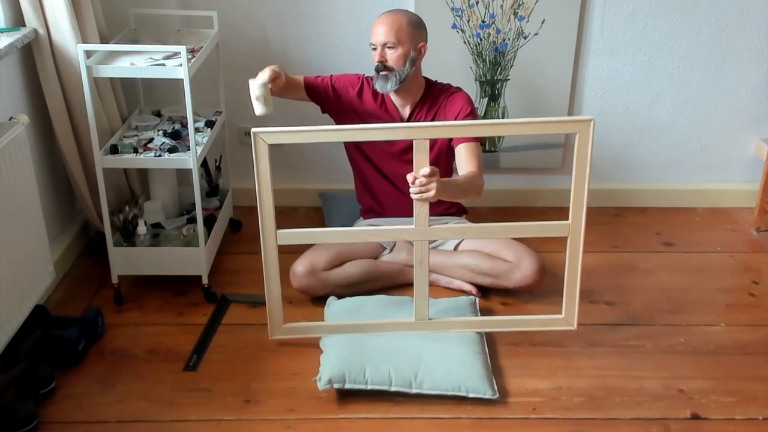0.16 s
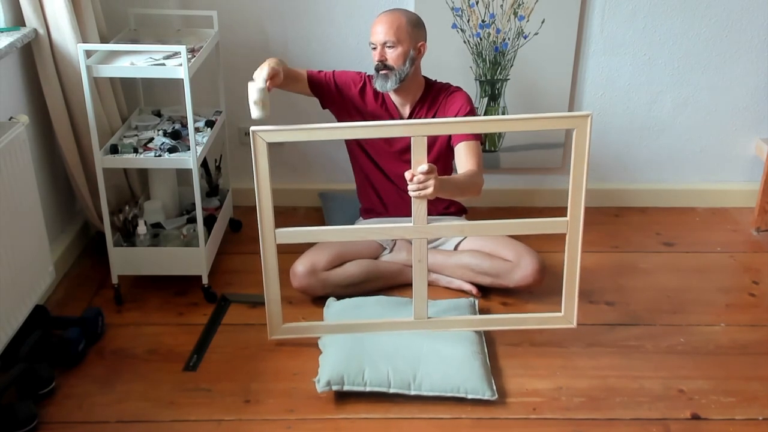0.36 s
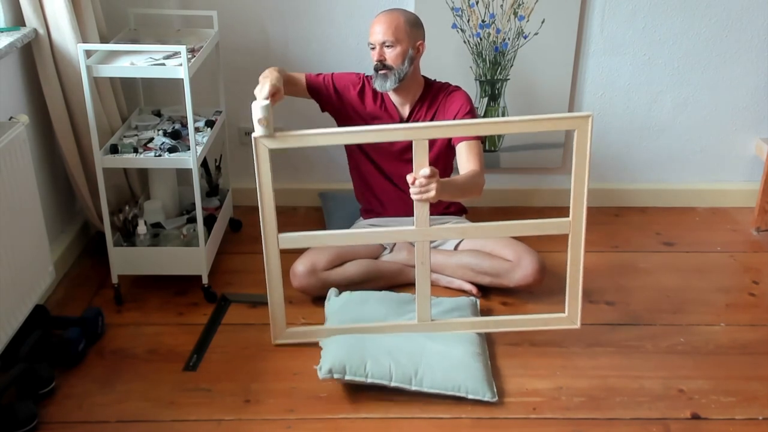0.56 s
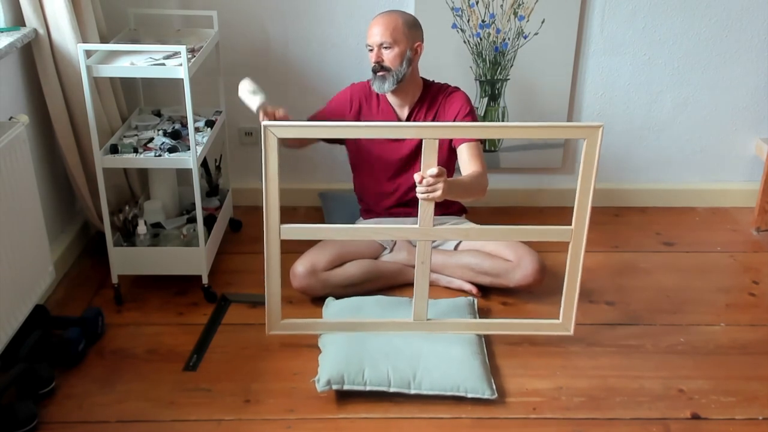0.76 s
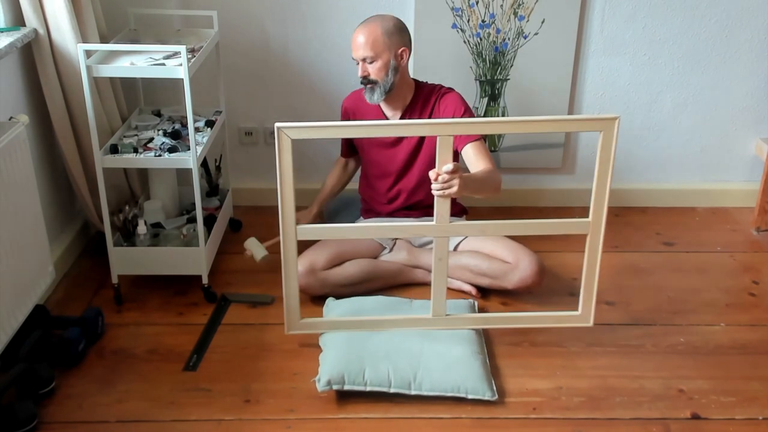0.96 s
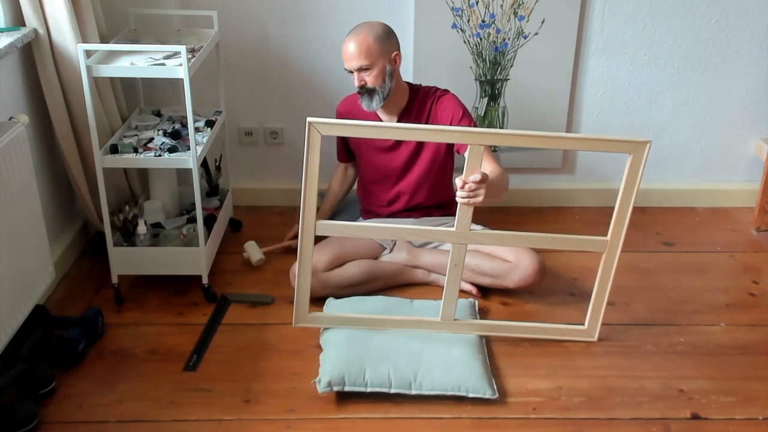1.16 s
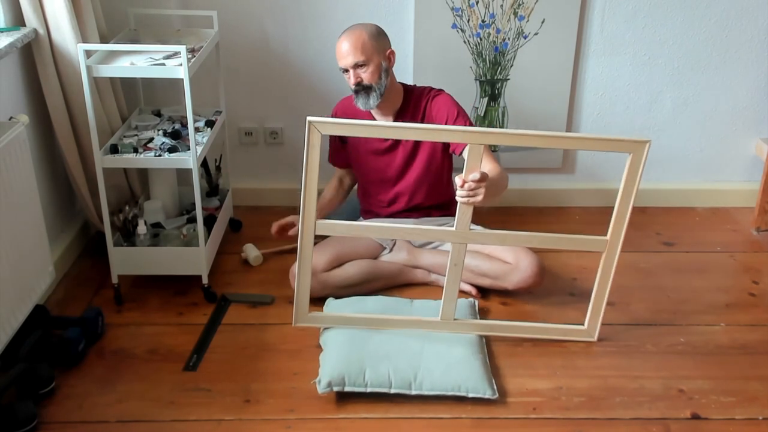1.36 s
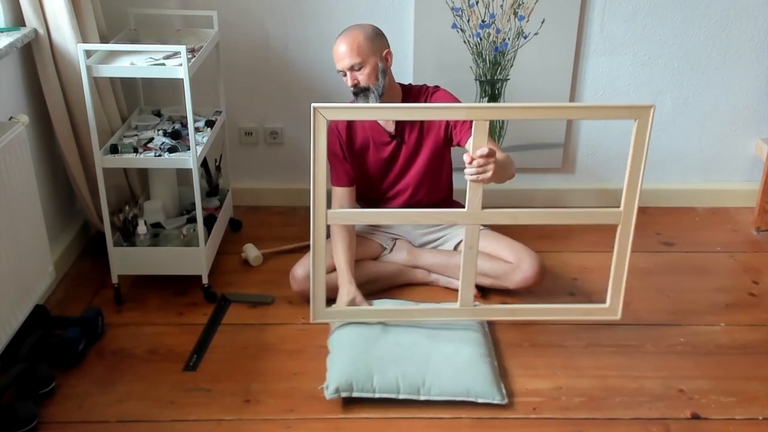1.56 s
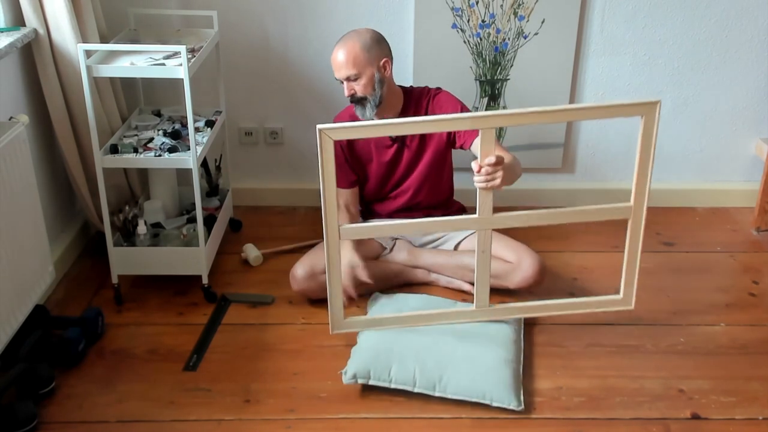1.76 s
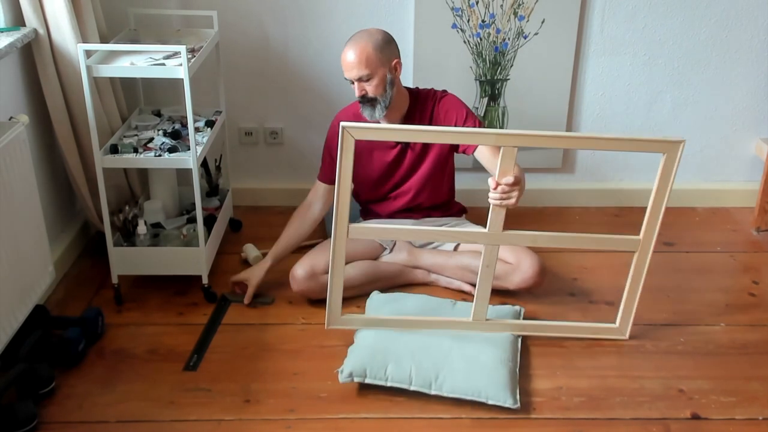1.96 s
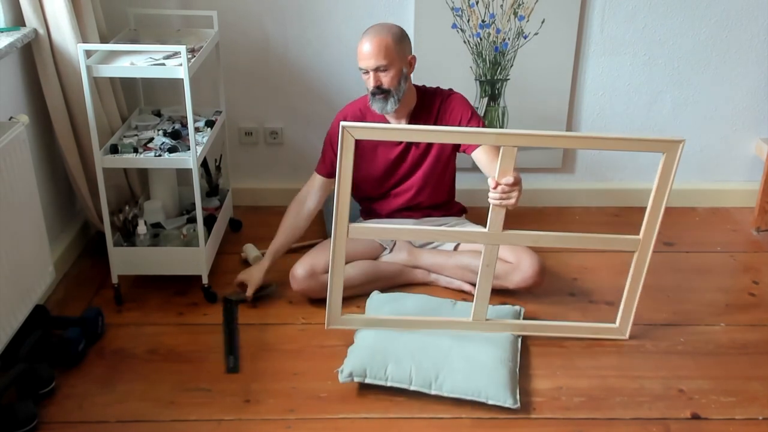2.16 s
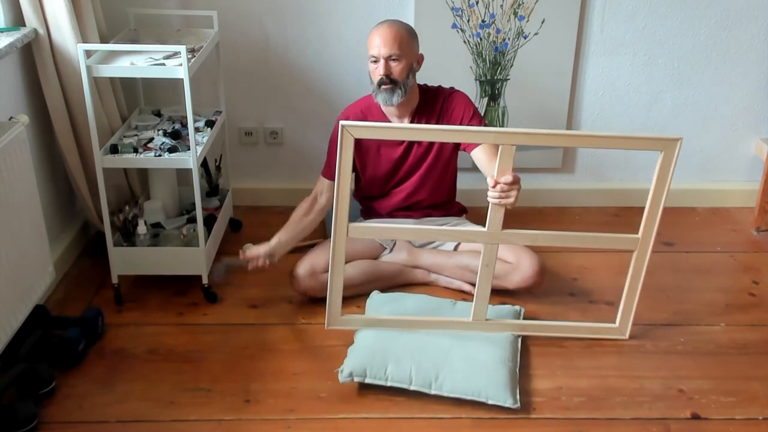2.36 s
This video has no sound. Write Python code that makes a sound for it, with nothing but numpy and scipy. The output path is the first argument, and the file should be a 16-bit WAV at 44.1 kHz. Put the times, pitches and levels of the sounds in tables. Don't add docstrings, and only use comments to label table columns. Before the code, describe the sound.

A soft mallet taps a light wooden frame at 0.1, 0.3 and 0.55 seconds, the first loudest, each hollow and short. Cloth rustles near 0.95; the mallet bumps onto floorboards around 1.15. The frame edge lands at 1.25 with a brief loose-wedge rattle, and its corner knocks at 1.9. From about 2.05 to 2.3 a steel square scrapes and rings over boards. Small, dry furnished room, quiet air noise, close microphone.

```python
import sys
import numpy as np
from scipy import signal
from scipy.io import wavfile

SR = 44100
rng = np.random.default_rng(int(sys.argv[2]) if len(sys.argv) > 2 else 0)


def magnitude_from_level(level_db):
    exponent = np.asarray(level_db, float) / 20
    return 10 ** exponent


def dump_mix(stems):
    frames = np.atleast_2d(stems).T
    limited = np.clip(frames, -1, 1)
    pcm = np.round(limited * 32767).astype(np.int16)
    wavfile.write(sys.argv[1], SR, pcm)


N = 110250

# [f/Hz, t60/s]
ROOM_T60 = [(100, 0.23), (400, 0.21), (1500, 0.17), (5000, 0.19), (14000, 0.12)]
ROOM_DB, ROOM_DELAY_S = -8, 0.0068
CRACK_S = 0.0013
EDGES_HZ = 25 * 2 ** np.arange(0, 9.6, .5)
BANK = [signal.butter(2, pair, "band", fs=SR, output="sos") for pair in zip(EDGES_HZ, EDGES_HZ[1:])]


def rms_one(x):
    return x / np.sqrt(np.mean(x ** 2) + 1e-20)


def in_time(rows, outside=None):
    s, db = np.transpose(rows)
    return magnitude_from_level(np.interp(np.arange(N) / SR, s, db, outside, outside))


def at_hz(points, hz):
    f, value = np.array(points)[:, 0], np.array(points)[:, 1]
    return np.interp(np.log(hz), np.log(f), value)


def samples(events):
    return (np.array(events)[:, 0] * SR).astype(int)


def drift(rate_hz):
    r = np.exp(-80 * np.pi * rate_hz / SR)
    slow = signal.lfilter([1], [1, -2 * r, r * r], rng.standard_normal(N // 40 + 2002))[2000:]
    return np.interp(np.arange(N) / 40, np.arange(len(slow)), rms_one(slow))


def ring(clicks, hz, t60_s):
    r, w = magnitude_from_level(-60 / (t60_s * SR)), 2 * np.pi * hz / SR
    return signal.lfilter([0, np.sin(w)], [1, -2 * r * np.cos(w), r * r], clicks + 1e-18)


def bands(size, first=0):
    white = rng.standard_normal((2, size))
    return [(np.sqrt(EDGES_HZ[k] * EDGES_HZ[k + 1]), signal.sosfilt(BANK[k], white[k % 2]))
            for k in range(first, len(BANK))]


def hiss(spectrum, patchy_db, first=0):
    together = drift(49)
    return rms_one(sum(magnitude_from_level(at_hz(spectrum, hz) + patchy_db * (together + drift(49))) * b
                       for hz, b in bands(N, first)))


def knocks(events, modes, levels_db, tail_db):
    size, mode_sum_db, contact_hz = 9000, -5.5, 2780
    body_room_db, notch_hz = -8.5, 415
    crack_rise_s, knee_hz, bite_db, bite_hz, tail_tilt_db = .00015, 500, 5.5, 3050, -2
    out, t, at = np.zeros(N + size), np.arange(size) / SR, samples(events)
    for k, ((hz, t60), db) in enumerate(zip(modes, levels_db)):
        clicks = np.zeros(len(out))
        clicks[at] = magnitude_from_level(np.array(events)[:, 1] + db + mode_sum_db) * (-1) ** k
        out += ring(clicks, hz, min(t60, .03 + 30 / hz))
    out = signal.lfilter(*signal.butter(2, contact_hz, fs=SR), out)
    notched = signal.lfilter(*signal.iirnotch(notch_hz, 2, fs=SR), out[:N])
    out[:N] += magnitude_from_level(body_room_db) * room(notched)

    crack = 2.06 * (1 - np.exp(-t / crack_rise_s)) * np.exp(-t / CRACK_S)
    onset = np.minimum(t / ROOM_DELAY_S, 1)
    for i, (_, db, crack_db, tilt_db) in zip(at, events):
        parts = []
        for hz, b in bands(size + 900, first=5):
            tilt = tilt_db * np.log2(max(hz, knee_hz) / 4000)
            bite = bite_db * np.exp(-np.log2(hz / bite_hz) ** 2)
            parts.append((hz, magnitude_from_level(tilt + bite) * b[900:]))
        rms = np.std(sum(b for _, b in parts))
        burst = 0
        for hz, b in parts:
            tail = magnitude_from_level(tail_db + tail_tilt_db * np.log2(hz / bite_hz) - 60 * t / at_hz(ROOM_T60, hz))
            burst = burst + b * (crack + tail * onset)
        out[i:i + size] += magnitude_from_level(db + crack_db) / rms / 2 * burst
    return out[:N]


def struck(events, modes, tail_db):
    # [f/Hz, t60/s]
    wood_t60 = [(125, 0.1), (300, 0.066), (1000, 0.023), (2000, 0.017)]
    hz, db = np.transpose(modes)
    lean = np.log2(hz / 500)[:, None] * np.array(events)[:, 4]
    scatter = 1.5 * rng.standard_normal((len(events), len(hz))).T
    return knocks(np.array(events)[:, :4], zip(hz, at_hz(wood_t60, hz)), db[:, None] + lean + scatter, tail_db)


def taps():
    # [t/s, peak/dB, crack re peak/dB, crack tilt/(dB/octave)]
    tap_rows = [
        (0.0805, -3, -7, -3),
        (0.3163, -10, -1.5, -2),
        (0.5637, -11, 1, -2),
    ]
    # [f/Hz, t60/s, level/dB at spots 1, 2, 3]
    frame_modes = [(133, 0.42, -17.5, -7, -35), (143, 0.3, -31, -17.5, -16.5), (255, 0.21, -23, -19.5, -17),
                   (350, 0.19, -26.5, -22.5, -12), (382.3, 0.032, 2.5, 6.5, -7.5),
                   (431.5, 0.061, 1.5, -11, 8.5), (528, 0.13, -23, -24.5, -10.5), (632, 0.048, -10, -6, -9),
                   (847, 0.031, -9.5, -6.5, 0), (1006, 0.025, -6.5, -4.5, 3),
                   (1106, 0.092, -13.5, -9.5, -1.5), (1284, 0.025, -12.5, -5.5, -3.5),
                   (187, 0.035, -20, -26, -35.5), (1237, 0.067, -16.5, -12, -10.5),
                   (1412, 0.042, -19.5, -12.5, -9.5), (1705, 0.06, -18.5, -11.5, -16.5),
                   (1916, 0.054, -14, -11.5, -5.5), (2390, 0.052, -26, -14.5, -16),
                   (2813, 0.012, -18, -8.5, 2), (3315, 0.024, -8, -6.5, -6)]
    slap_db = [-24, -3.5, -28]
    slap_hz, slap_width_hz, slap_tail_db = 12740, 680, -20.5
    wall_s, wall_db, wall_hz = .0125, -17, 7000
    hum_t60_s, hum_db = .45, -46
    m, t, at = np.array(frame_modes), np.arange(6000) / SR, samples(tap_rows)
    clicks, slap = np.zeros(N), np.zeros(N)
    clicks[at] = magnitude_from_level(hum_db)
    decay = np.exp(-t / CRACK_S) + magnitude_from_level(slap_tail_db - 60 * t / at_hz(ROOM_T60, slap_hz))
    for i, db in zip(at, slap_db):
        slap[i:i + len(t)] = magnitude_from_level(db) * decay * rng.standard_normal(len(t))
    slap = signal.lfilter(*signal.iirpeak(slap_hz, slap_hz / slap_width_hz, fs=SR), slap)
    x = knocks(tap_rows, m[:, :2], m[:, 2:], tail_db=-12) + 2 * slap
    echo = np.roll(signal.lfilter(*signal.butter(1, wall_hz, fs=SR), x), int(wall_s * SR))
    hum = ring(clicks, 383, hum_t60_s) + ring(clicks, 243, hum_t60_s)
    return x + magnitude_from_level(wall_db) * echo + hum


def mallet_laid():
    # [t/s, peak/dB, crack/dB, crack tilt/(dB/octave), body tilt/(dB/octave)]
    bounces = [
        (1.1285, -19, -4.5, -11.5, -2),
        (1.1575, -28, -19, -2, -4.2),
        (1.1622, -13, -17, -8, 3.5),
        (1.176, -22, -29, -6, 1),
        (1.19, -36, -14, -20, -8),
    ]
    # [f/Hz, level/dB]
    board_modes = [(125, 4), (190, -5.5), (248, 0.5), (294, 2), (391, -0.5), (500, -4), (620, -8),
                   (749, -22.5), (1062, -13)]
    return struck(bounces, board_modes, tail_db=-3)


def frame_landing():
    # [t/s, peak/dB, crack/dB, crack tilt/(dB/octave), body tilt/(dB/octave)]
    impacts = [
        (1.2416, -6.5, -3, -12.5, -4),
        (1.2515, -32, -8, 4, -4),
        (1.2565, -11.5, -8, -14.5, 5),
        (1.267, -35, 7, -3.5, 7),
        (1.274, -20, -12, -3, -3.5),
        (1.284, -34.5, 9, -5.5, 0.1),
        (1.297, -35, -14, -3, -2),
        (1.321, -36.5, 6, -1.5, -10),
    ]
    # [f/Hz, level/dB]
    edge_modes = [(245, -44), (296, -1), (340, -22), (411, -16), (630, -19), (750, -9.5), (969, 0.5),
                  (1171, -1), (1491, -12), (1927, -16)]
    return struck(impacts, edge_modes, tail_db=-9.5)


def corner_set_down():
    # [t/s, peak/dB, crack/dB, crack tilt/(dB/octave), body tilt/(dB/octave)]
    touches = [
        (1.5235, -49, -1.5, -19, -8),
        (1.712, -47, -11, 0, -6.5),
        (1.901, -11, -4, -8.5, 0.2),
        (2.057, -50, -9.5, -9, 8),
        (2.2135, -28, -28, -5, 8.7),
    ]
    # [f/Hz, level/dB]
    corner_modes = [(150, -15.5), (255, -8.5), (340, -6), (481, 2), (550, 5), (594, -9.5), (640, -3.5),
                    (725, 0.3), (860, -7.5), (1082, -1), (1234, -1), (1567, -6)]
    return struck(touches, corner_modes, tail_db=-8.0)


def wedges():
    # [t/s, level/dB]
    chatter_rows = [(1.249, -49), (1.252, -28), (1.28, -40), (1.297, -44), (1.335, -52.5), (1.38, -74)]
    # [f/Hz, density/(dB/Hz)]
    chatter_colour = [(880, -35), (1500, 1), (4080, -11.5), (6690, -18), (8080, -17), (11000, -25),
                      (13800, -12.5), (16000, -26.5)]
    # [t/s, level/dB]
    tick_rows = [
        (1.3025, -22),
        (1.3135, -25),
    ]
    ring_hz, ring_t60_s, ring_db, still_s = 6605, .014, -21, 1.29
    chatter = in_time(chatter_rows, -120)
    x = chatter * magnitude_from_level(1.9 * drift(240)) * hiss(chatter_colour, patchy_db=2.0, first=11)
    t, ticks = np.arange(400) / SR, np.zeros(N)
    for s, db in tick_rows:
        i = int(s * SR)
        ticks[i:i + 400] = magnitude_from_level(db) * rng.standard_normal(400) * np.exp(-t / .0015)
    ticks = signal.sosfilt(signal.butter(2, [1200, 8000], "band", fs=SR, output="sos"), ticks)
    shake = chatter * rng.standard_normal(N) * (np.arange(N) < still_s * SR)
    bright = magnitude_from_level(ring_db) * ring(x + ticks + shake, ring_hz, ring_t60_s)
    return x + bright + ticks + magnitude_from_level(ROOM_DB - 20.0) * room(ticks)


def noise_unity(t60_s):
    return np.sqrt(4 * np.log(1000) / (t60_s * SR))


def steel_square():
    # [t/s, level/dB]
    drag_rows = [(1.975, -81), (1.995, -57), (2.045, -59), (2.09, -46), (2.14, -34), (2.175, -25.5),
                 (2.205, -41), (2.228, -18), (2.243, -35.5), (2.27, -49), (2.3, -50), (2.36, -95)]
    # [t/s, level/dB]
    pressure_rows = [(1.96, -84), (2.01, -39.5), (2.045, -66), (2.07, -50.5), (2.09, -49), (2.135, -40),
                     (2.18, -50.5), (2.205, -40), (2.218, -27.5), (2.232, -44.5), (2.245, -36), (2.29, -50),
                     (2.33, -92)]
    # [t/s, level/dB]
    snags = [(1.971, -69.5), (1.988, -57), (2.068, -58.5), (2.092, -50), (2.137, -38), (2.188, -34.5),
             (2.2, -30), (2.238, -35), (2.284, -43.5)]
    # [f/Hz, level/dB]
    steel_modes = [(4210, -4), (4624, -6), (4893, -5), (5421, -7), (5975, -2), (6029, -2), (6455, 0.5),
                   (7208, 3.5), (7564, -5.5), (8457, -8.5), (8742, -4), (9168, -11), (9884, -4.5),
                   (3397, -12), (10331, -6), (11041, -15), (11639, -11), (12915, -4), (13076, -14.5),
                 (13447, -7.5), (13954, -11.5), (14530, -18), (14971, -12.5), (15369, -8)]
    # [f/Hz, t60/s]
    steel_t60 = [(4000, 0.091), (14000, 0.14)]
    # [f/Hz, width/Hz, level/dB]
    board_buzz = [(337, 26, -3), (558, 55, -2), (640, 28, 1.3), (1013, 55, 5.5), (1304, 55, -0.8),
                  (1470, 76, 4.5), (2250, 95, 3)]
    # [f/Hz, level/dB, t60/s]
    lift_modes = [(1200, -12, 1), (2083, -7, 0.5), (2584, -1, 0.26), (2950, 3, 0.45), (3408, 3, 0.25),
                  (3849, 8, 0.8), (3853.5, 11, 0.28), (4899, -3, 0.45)]
    # [f/Hz, density/(dB/Hz)]
    grit_colour = [(120, -44), (200, -1), (538, 3.5), (836, -13), (986, 7.5), (3690, -0.5), (5940, -11),
                   (7970, -19.5), (16000, -28)]
    grains_per_s, lift_s, lift_db, split_hz = 1200, 2.287, -53, 5200
    ring_db, grit_db, buzz_db, hiss_db = -18.5, -8.5, -7.5, 2

    hits = rng.random(N) < grains_per_s / SR
    force = magnitude_from_level(3 * rng.standard_normal(N) + 2.1 * drift(26))
    grains = rms_one(hits * force * rng.choice([-1, 1], N))
    drag, pressure = in_time(drag_rows, -120), in_time(pressure_rows, -120)
    pluck, press = grains * drag, grains * pressure
    for s, db in snags:
        i = int(s * SR)
        pluck[i:i + 300] += 6 * magnitude_from_level(db) * rng.standard_normal(300) * np.hanning(400)[100:]

    modes = [(hz, db, at_hz(steel_t60, hz)) for hz, db in steel_modes]
    modes += [(hz, -19, 0.15) for hz in 4000 * 3.8 ** rng.random(16)]
    steel = sum(noise_unity(t60) * ring(magnitude_from_level(db + 3 * drift(25)) * pluck, hz, t60) for hz, db, t60 in modes)

    top_db = max(p[2] for p in board_buzz)
    buzz = 0
    for hz, width, db in board_buzz:
        t60 = 2.2 / width
        buzz = buzz + magnitude_from_level(db - top_db) * noise_unity(t60) * ring(press * magnitude_from_level(4 * drift(18)), hz, t60)

    lift = np.zeros(N)
    lift[int(lift_s * SR)] = magnitude_from_level(lift_db)
    free = sum(magnitude_from_level(db) * ring(lift, hz, t60) for hz, db, t60 in lift_modes)

    rub = hiss(grit_colour, patchy_db=2.5, first=5)
    low, high = [signal.sosfilt(signal.butter(3, split_hz, side, fs=SR, output="sos"), rub)
                 for side in ("low", "high")]
    grit = pressure * low + magnitude_from_level(hiss_db) * drag * high
    x = magnitude_from_level(ring_db) * steel + magnitude_from_level(buzz_db) * buzz + magnitude_from_level(grit_db) * grit + free
    return x + magnitude_from_level(ROOM_DB) * room(x)


def thumps():
    # [t/s, level/dB]
    blows = [
        (0.081, -46),
        (0.316, -57),
        (0.564, -51),
        (1.243, -44),
        (1.902, -55),
    ]
    clicks = np.zeros(N)
    clicks[samples(blows)] = magnitude_from_level(np.array(blows)[:, 1])
    return ring(clicks, 38.3, 0.11)


def cloth():
    # [t/s, level/dB]
    spells = [
        [(.84, -77), (.9, -57.5), (.96, -50.5), (1.03, -53), (1.07, -66.5), (1.12, -99.5)],
        [(1.4, -77), (1.515, -64.5), (1.54, -51), (1.57, -57), (1.73, -56), (1.76, -62), (1.82, -52),
         (1.87, -64), (1.95, -63)],
        [(2.36, -97), (2.43, -65), (2.5, -58.5)],
    ]
    # [f/Hz, density/(dB/Hz)]
    cloth_colour = [(120, -89), (200, -14), (305, -15.5), (456, -16.5), (647, 0.5), (696, -22), (851, -3),
                    (14900, -25), (16000, -15.5)]
    return sum(in_time(rows, -120) for rows in spells) * hiss(cloth_colour, patchy_db=-1.3, first=5)


def wipe():
    # [t/s, centre f/Hz, level/dB]
    wipe_rows = [
        (1.705, 400, -75),
        (1.725, 600, -60),
        (1.742, 900, -55),
        (1.76, 1400, -72),
    ]
    s, hz, db = np.transpose(wipe_rows)
    phase = 2 * np.pi * np.cumsum(np.interp(np.arange(N) / SR, s, hz)) / SR
    squeak = drift(190) * np.cos(phase) + drift(150) * np.sin(phase)
    return in_time(np.transpose([s, db]), -120) * squeak


def rumble():
    # [t/s, level/dB]
    rumble_rows = [(0, -68.5), (.3, -68), (.45, -60), (.8, -75.5), (1.1, -66.5), (1.4, -56), (1.65, -62),
                   (1.85, -61), (2.3, -63.5), (2.5, -61.5)]
    hz = 105
    sos = signal.butter(2, [hz / 1.4, hz * 1.3], "band", fs=SR, output="sos")
    low = signal.sosfilt(sos, rng.standard_normal(N))
    return in_time(rumble_rows) * magnitude_from_level(0.83 * drift(22)) * rms_one(low)


def room(x):
    t = np.arange(SR // 2) / SR
    echo = sum(b * magnitude_from_level(-60 * t / at_hz(ROOM_T60, hz)) for hz, b in bands(len(t)))
    echo = echo * np.clip(t / ROOM_DELAY_S, 0, 1) ** 2
    return signal.fftconvolve(x, echo / np.sqrt(np.sum(echo ** 2)))[:N]


def room_tone():
    # [t/s, level/dB]
    air_rise = [(.07, 9), (.15, 1.4), (.85, 3), (1.1, 9.5), (1.5, 9.5)]
    # [f/Hz, density/(dB/Hz)]
    air_colour = [(25, -4.5), (45, -12), (120, -6.5), (250, -11), (600, -11.5), (2000, -20.5),
                  (8000, -27.5), (16000, -25.5)]
    return magnitude_from_level(-73.5) * in_time(air_rise) * hiss(air_colour, patchy_db=-2.6)


def scene():
    near = taps() + mallet_laid() + frame_landing() + corner_set_down() + steel_square() + wedges()
    near = signal.sosfilt(signal.butter(2, 251, "high", fs=SR, output="sos"), near)
    return (near + thumps() + cloth() + wipe() + rumble() + room_tone())[None]


def roll_off(x):
    return signal.sosfilt(signal.butter(12, 17300, fs=SR, output="sos"), x)


def record(dry):
    presence_hz, width_hz, cutoff_hz = 15200, 560, 15950
    lifted = signal.lfilter(*signal.iirpeak(presence_hz, presence_hz / width_hz, fs=SR), dry)
    x = dry + 0.18 * lifted
    x = signal.sosfilt(signal.cheby2(8, 28, cutoff_hz * 1.02, fs=SR, output="sos"), x)
    return roll_off(x)


dry = scene()
out = record(dry)
dump_mix(out)
```